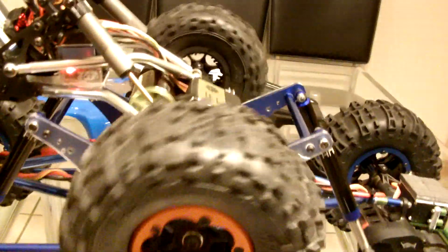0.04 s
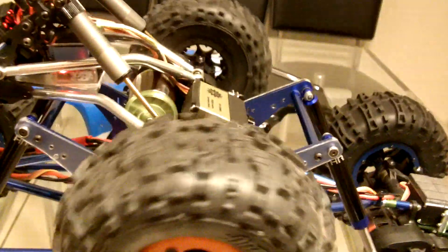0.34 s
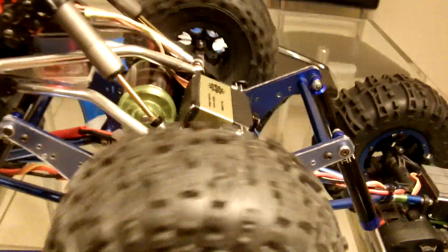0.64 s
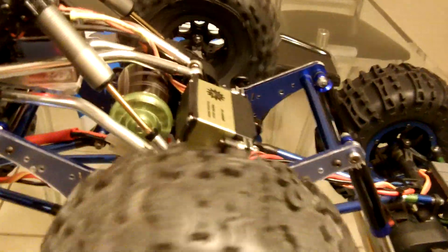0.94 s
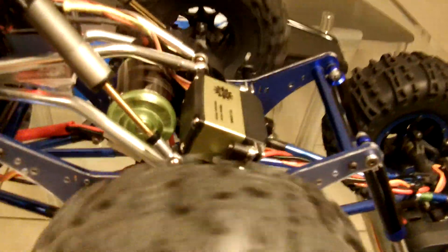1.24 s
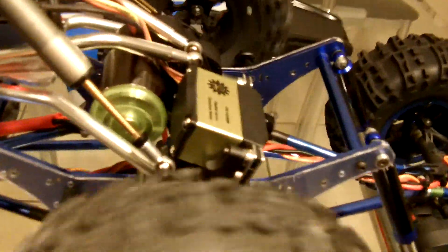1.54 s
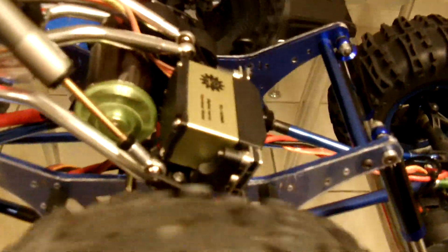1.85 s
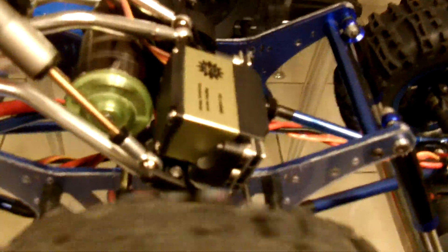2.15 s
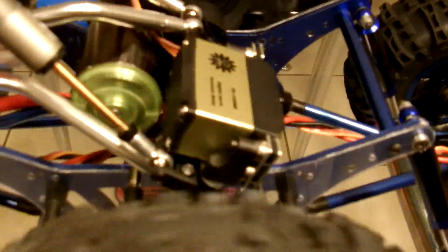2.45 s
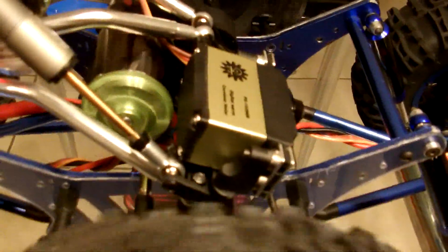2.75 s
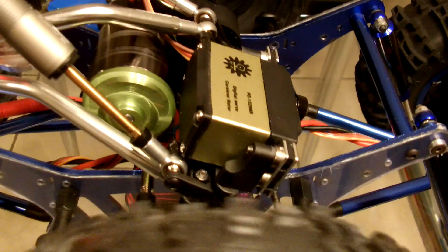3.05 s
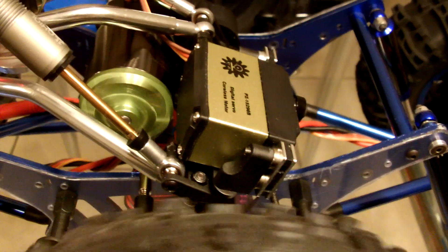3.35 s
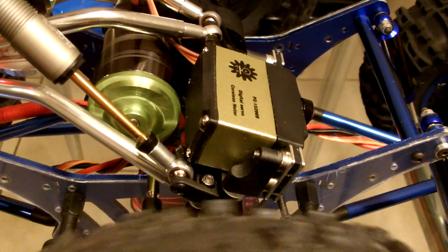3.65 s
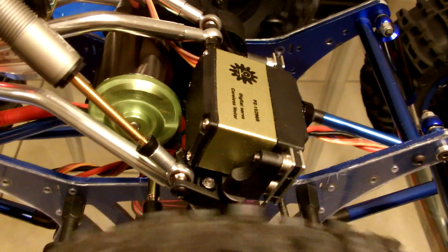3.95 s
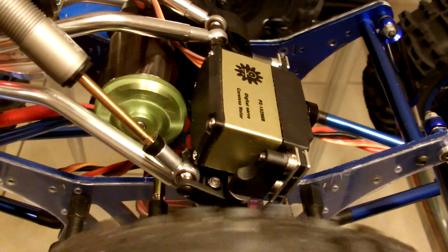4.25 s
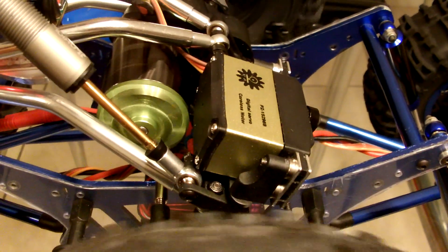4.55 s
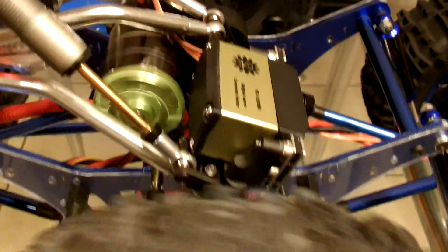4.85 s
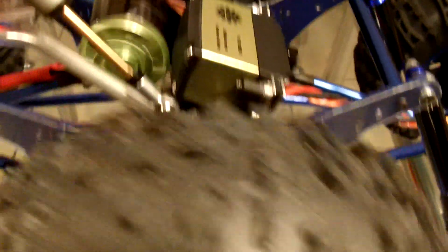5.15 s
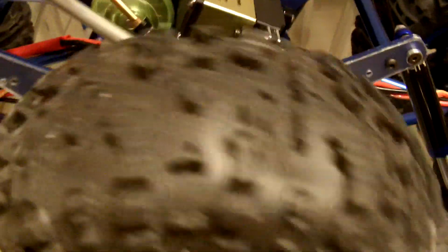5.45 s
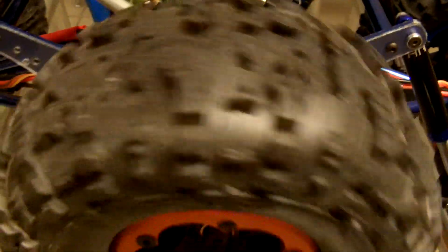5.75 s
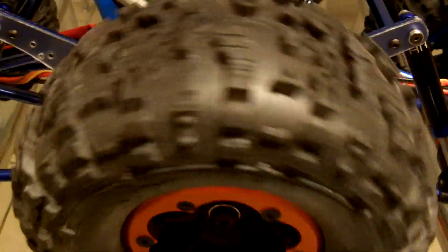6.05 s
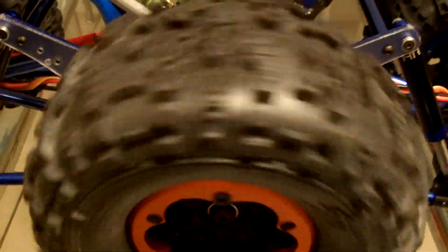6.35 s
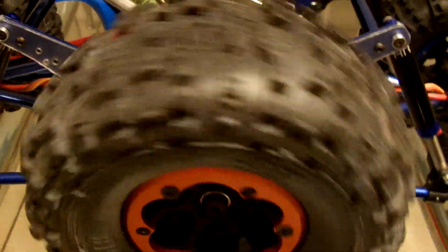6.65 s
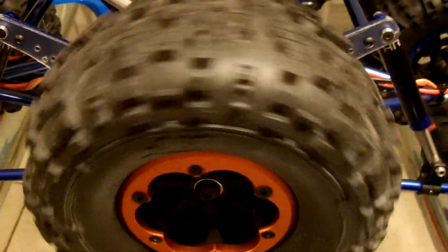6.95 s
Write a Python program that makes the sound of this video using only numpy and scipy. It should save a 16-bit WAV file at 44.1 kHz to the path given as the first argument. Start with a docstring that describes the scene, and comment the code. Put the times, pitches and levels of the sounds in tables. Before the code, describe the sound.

Close up, a remote-control crawler's motor gives a thin, steady high whine while its gears rasp lightly and tick now and then.

```python
"""A brushless motor creeps in a model crawler on a stand, turning its wheels close to a handheld camera.
From the start the speed controller's switching tone sings in the windings, modulated by each commutation
step; the steps ring the motor can, rattle the gears and shake the chassis, and the shaft surges once a
turn. In the first two seconds come a short hum, a dull bump and a second hum; soft ticks recur throughout.
The camera moves in, then draws back after five seconds, and near reflections comb the hiss as it goes."""
import sys
import numpy as np
from scipy import signal
from scipy.fft import rfft, irfft, next_fast_len
from scipy.io import wavfile
from scipy.ndimage import map_coordinates

SR = 44100
rng = np.random.default_rng(int(sys.argv[2]) if len(sys.argv) > 2 else 0)


def transcribe(signal):
    """Save signal, clipped to [-1, 1], as a 16-bit WAV file at the path in sys.argv[1]."""
    frames = np.atleast_2d(signal).T
    limited = np.clip(frames, -1, 1)
    pcm = np.round(limited * 32767).astype(np.int16)
    wavfile.write(sys.argv[1], SR, pcm)


N = 313330
TIME = np.arange(N) / SR


def amp(db):
    return 10 ** (np.asarray(db) / 20)


def unit_rms(x):
    return x / np.sqrt(np.mean(x ** 2) + 1e-20)


def along(points, hz):
    """Interpolation of (Hz, value) points on a log frequency axis."""
    f, values = np.transpose(points)
    return np.interp(np.log(hz + 1), np.log(f + 1), values)


def curves(rows):
    """Linear interpolation: one value per sample for each column after the time."""
    times, *columns = np.transpose(rows)
    return [np.interp(TIME, times, column) for column in columns]


def wobble(rate):
    """Smooth random modulation with rate knots a second."""
    grid = np.arange(0, N * rate / SR + 1, 1 / 4)
    knots = rng.standard_normal(int(N * rate / SR) + 4)
    return np.interp(TIME * rate, grid, map_coordinates(knots, [grid]))


def pulse(phase, at, width):
    """A periodic Gaussian pulse; place and width in cycles."""
    return np.exp(-(((phase - at + .5) % 1 - .5) / width) ** 2)


def filtered(x, response):
    """Linear filtering by a complex frequency response."""
    size = next_fast_len(N + SR // 2)
    return irfft(rfft(x, size) * response(np.fft.rfftfreq(size, 1 / SR)), size)[..., :N]


def resonance(f, hz, width):
    """Response of a damped oscillator; bandwidth in Hz."""
    return 1j * f * width / (hz * hz - f * f + 1j * f * width)


def mode(hz, width, skirt=0.13):
    """Two resonances in cascade: the broad one steepens the skirts of the narrow one."""
    return lambda f: resonance(f, hz, width) * resonance(f, hz, skirt * hz)


def panned(db):
    """Constant-power gains for a left-minus-right level difference."""
    gains = amp(np.array([db, -db]) / 2).reshape(2, -1)
    return gains / np.sqrt(np.mean(gains ** 2, axis=0))


# Likeness of the two channels. Each row: frequency in Hz, left-right coherence from 0 to 1.
COHERENCE = [(100, 1), (350, 0.89), (650, 0.77), (1100, 0.96), (2200, 1), (3700, 0.92), (7000, 0.91),
             (10000, 0.73), (15000, 0.33)]

def shaken(force, response, lag_s=1.5e-5):
    """Random forcing of a linear system: partly coherent stereo noise of rms 1, the right side leading."""
    size = next_fast_len(N + SR // 8, real=True)
    f = np.fft.rfftfreq(size, 1 / SR)
    coherence = along(COHERENCE, f)
    spectrum = rfft(force * rng.standard_normal((2, N)), size) * response(f)
    mid, side = spectrum * np.sqrt([1 + coherence, 1 - coherence])
    left = (mid + side) * np.exp(-2j * np.pi * f * lag_s)
    return unit_rms(irfft([left, mid - side], size)[:, :N])


# Spectrum of the room air. Each row: frequency in Hz, relative density in dB.
AIR_SPECTRUM = [(20, -40), (65, -38), (105, -18), (160, -4), (210, -4), (350, -3), (500, 0), (900, -7.5),
                (3000, -22), (15000, -45)]
# The room's low hum. Each row: time in seconds, mean level in dB.
ROOM_HUM = [(0.0, -85), (.6, -84), (.85, -74.5), (1.4, -75), (1.8, -85), (2.7, -83.5), (3.0, -75.5),
            (4.4, -78), (4.9, -74), (5.4, -78.5), (5.9, -75), (6.6, -77.5), (7.1, -81)]

def room(air_db=-68.0, hum_hz=236):
    """Ambient noise: quiet air and a faint hum under random amplitude and phase modulation."""
    hum_db, = curves(ROOM_HUM)
    level = amp(hum_db + 2.7 * wobble(9))
    hum = level * np.sqrt(2) * np.sin(2 * np.pi * hum_hz * TIME + 1.9 * wobble(8))
    return hum + amp(air_db) * shaken(1, lambda f: amp(along(AIR_SPECTRUM, f)))


# Hums near the microphone. Each row: start in seconds, end in seconds, level in dB.
SHORT_HUMS = [(0.162, 0.402, -57.5), (1.613, 1.955, -62)]

def short_hums(hz=460.0, fade_s=0.11, left_lead_rad=0.18):
    """A nearly pure tone under two trapezoidal envelopes."""
    swell = sum(amp(db) * np.clip(np.minimum(TIME - start, end - TIME) / fade_s + .5, 0, 1)
                for start, end, db in SHORT_HUMS)
    phase = 2 * np.pi * hz * TIME + 0.13 * wobble(19) + np.array([[left_lead_rad], [0]])
    return swell * np.sqrt(2) * np.sin(phase)


def struck(start, modes, attack_s=0.0001):
    """Free vibration: (Hz, dB, T60 in seconds) modes start together and decay exponentially."""
    t = np.arange(SR // 5) / SR
    ring = sum(amp(db + rng.normal(0, 1) - 60 * t / t60) * np.sin(2 * np.pi * hz * t)
               for hz, db, t60 in modes)
    return np.pad(ring * (1 - np.exp(-t / attack_s)), (round(start * SR), N))[:N]


def bump(start_s=.5975, gain_db=-52):
    """Low, heavily damped modes with a soft onset make one dull bump."""
    modes = [(130, -12, .05), (214, -6, 0.05), (260, 3.5, 0.058)]
    return amp(gain_db) * struck(start_s, modes, attack_s=0.0023)


# Soft ticks. Each row: start in seconds, gain in dB, extra gain of the low knock in dB.
TICKS = [(0.435, -44.5, 4), (1.0797, -44, -4), (2.0868, -38.5, -9), (2.7815, -41, -5.5),
         (3.5166, -41.5, -2), (4.2249, -41.5, -3.5), (5.2257, -40.5, -6), (5.921, -44.5, 1),
         (6.6447, -48.5, 6)]
# Modes of a tick and of its knock. Each row: frequency in Hz, relative level in dB, T60 in seconds.
TICK_MODES = [(1130, 1, 0.0084), (1380, 1, 0.015), (1870, -6, 0.015), (2200, -21, 0.0047)]
KNOCK_MODES = [(290, -10, 0.027), (583, 3.5, .016)]

def ticks(low_cut_hz=290):
    """Impulse excitation: dry ticks near the microphone, too light to carry bass."""
    rings = sum(amp(db) * (struck(start, TICK_MODES) + amp(knock_db) * struck(start, KNOCK_MODES))
                for start, db, knock_db in TICKS)
    return filtered(rings, lambda f: (1j * f / (1j * f + low_cut_hz)) ** 2)


# The shaft's progress, about nine turns a second. Each row: time in seconds, turns completed.
SHAFT_TURNS = [(-0.148, 0), (0.259, 4), (0.917, 10), (1.533, 16), (2.871, 28), (3.332, 32), (4.06, 38),
               (4.688, 44), (6.027, 56), (6.486, 60), (7.192, 66)]

def rotation(steps_per_turn=13.91, surge=.155, gear_steps=26.35, gear_surge=.052, jitter=.014):
    """Periodic load: shaft and slower gear each drag once a turn, modulating the commutation rate."""
    shaft, = curves(SHAFT_TURNS)
    steps = steps_per_turn * (shaft - surge * np.sin(2 * np.pi * shaft) / (2 * np.pi))
    steps -= gear_surge * gear_steps * np.sin(2 * np.pi * (steps / gear_steps + .43)) / (2 * np.pi)
    return shaft, steps + jitter * wobble(90)


# Groans of the drive train. Each row: peak time in seconds, frequency in Hz, relative level in dB.
GROANS = [(0.871, 405, -68), (1.084, 420, -66.3), (1.18, 415, -65.7), (1.386, 410, -68),
          (1.487, 430, -66.0), (1.708, 400, -66.7), (2.264, 416, -66), (2.379, 400, -68),
          (2.504, 400, -65.1), (2.597, 400, -65), (2.718, 402, -65), (2.949, 400, -66.7),
          (3.174, 400, -65.0), (3.403, 400, -68.0), (4.116, 397, -66), (4.335, 415, -63.4),
          (4.451, 424, -64), (4.542, 426, -64.4), (4.654, 417, -63.7), (4.743, 400, -67), (4.866, 397, -68),
          (5.082, 410, -65.1), (5.372, 430, -65), (5.532, 410, -66), (5.758, 415, -66), (5.864, 395, -70),
          (6.206, 404, -68.6), (6.555, 400, -70)]

def groans(gain_db=1.0, swell_s=0.021):
    """Gaussian tone bursts: brief tones near 400 Hz swell in the chassis, mostly as the shaft surges."""
    t = np.arange(-SR // 10, SR // 10) / SR
    swell = np.exp(-(t / swell_s) ** 2)
    out = np.zeros(N + SR)
    for peak, hz, db in GROANS:
        tone = np.sqrt(2) * np.sin(2 * np.pi * (hz * t + rng.random()))
        out[round((peak + t[0]) * SR):][:len(t)] += amp(db + gain_db) * swell * tone
    return out[:N]


# Modes of the chassis. Each row: frequency in Hz, bandwidth in Hz, relative level in dB.
CHASSIS_MODES = [(237, 17, -4.5), (407, 27, -3.5), (467, 16, 4), (546, 40, 0.5), (730, 71, -6),
                 (1548, 61, -1.5)]

def chassis(shaft, steps, level_db=-65.5, scatter=0.14, radiate_hz=170, surge_db=3.5):
    """Modal superposition: torque steps thud through a chassis too small to radiate deep bass."""
    def response(f):
        modes = sum((-1) ** k * amp(db) * resonance(f, hz, width)
                    for k, (hz, width, db) in enumerate(CHASSIS_MODES))
        return modes * f * f / (f * f + radiate_hz ** 2)

    jolts = np.diff(np.floor(steps), prepend=np.floor(steps[0]))
    jolts *= 1 + scatter * rng.standard_normal(N)
    jolts *= amp(surge_db * pulse(shaft, at=0.63, width=0.12))
    return amp(level_db) * unit_rms(filtered(jolts, response))


# Reflection off the tyre. Each row: time in seconds, delay in milliseconds, share of direct amplitude.
TYRE_ECHO = [(0.0, 0.66, 0.13), (.27, 0.69, 0.12), (.7, 0.77, 0.16), (1.25, 0.75, 0.098), (1.6, 0.84, 0.14),
             (4.95, 0.85, 0.032), (5.3, 0.78, 0.12), (5.6, 0.77, 0.12), (6.0, 0.77, 0.12),
             (6.5, 0.74, 0.089), (7.1, 0.74, 0.16)]
# Reflection off the frame, heard from above. Each row: time in seconds, share of direct amplitude.
FRAME_ECHO = [(1.3, 0), (1.7, .24), (4.6, .24), (5.1, .18), (5.4, 0)]

def reflections(direct, frame_ms=1.093, phase_rad=1.5, second_ms=0.55, second_share=0.36):
    """Comb filtering: short echoes interfere with the direct sound, and shift as the camera moves."""
    hz, t, spectra = signal.stft(direct, SR, nperseg=512)
    tyre_ms, tyre, frame = (np.interp(t, TIME, c) for c in curves(TYRE_ECHO) + curves(FRAME_ECHO))
    delay = lambda ms: np.exp(-2j * np.pi * hz[:, None] * ms / 1000)
    first = np.exp(-1j * phase_rad) * (tyre * delay(tyre_ms) + frame * delay(frame_ms))
    second = second_share * tyre * delay(tyre_ms + second_ms)
    return signal.istft(spectra * (1 + first + second), SR, nperseg=512)[1][:, :N]


# Teeth that catch. Each row: peak time in seconds, lift below the split in dB, lift above it in dB.
SCRAPES = [(.28, 2.5, 4), (.402, 0.5, 3), (.515, 2.5, 1), (.735, 6, 4.5), (.945, 0, 1), (1.15, 3.5, 1),
           (1.362, 4.5, 1), (1.563, 3.5, 2), (1.8, 2, 0), (2.007, 2.5, 3), (2.11, 2, 4.5), (2.26, 5, 5),
           (2.35, 1.5, 2), (2.575, 3, 3.5), (2.688, 3, -2), (2.796, 0, 4), (3.028, 6, 1.5), (3.16, 2, 1),
           (3.255, 1.5, 1), (3.74, 1.5, 0), (3.98, 1.5, 1), (4.085, 1.5, 4), (4.22, 3.5, 2),
           (4.312, 3.5, 6.5), (4.415, 5, 4), (4.512, 3.5, 3.5), (4.61, 4.5, 3), (4.716, 2, 3),
           (4.935, 3, 6), (5.17, 4, -2), (5.614, 5, -2), (5.74, 0.5, 3), (5.949, 0, 1), (6.08, -1, 5),
           (6.165, 3, 7), (6.31, 0, 5), (6.407, 0, 6), (6.545, 0, 5), (6.881, 2, 7)]

def scraped(rustle, split_hz=3900, rise_s=0.0055, fade_s=0.033):
    """Transient friction: catching teeth lift the rustle, dully or brightly; it rises fast and fades."""
    t = TIME[::32]
    peaks, *lifts = np.transpose(SCRAPES)
    since = t - peaks[:, None]
    shapes = np.exp(-np.clip(np.maximum(-since / rise_s, since / fade_s), 0, 20))
    middle_gain, treble_gain = (amp(np.interp(TIME, t, db @ shapes)) for db in lifts)
    middle = filtered(rustle, lambda f: 1 / (1 + (f / split_hz) ** 10))
    return middle_gain * middle + treble_gain * (rustle - middle)


# Spectrum of the rubbing teeth. Each row: frequency in Hz, relative density in dB.
RUSTLE_SPECTRUM = [(100, -52), (300, -14.5), (600, -8.5), (950, -8), (1400, -1.5), (1800, -2.5),
                   (2400, -1.5), (3050, -0.5), (3450, -2), (4000, 1), (4400, 1.5), (4950, 1), (5520, 4),
                   (5800, 2), (6400, -3), (13000, 0), (15500, 0.5)]

def gear_rustle(shaft, steps, near_db, gain_db=-47, gear_ratio=.528):
    """Sliding friction: teeth rub harder once per turn of the shaft and of the slower gear."""
    rub_db = 1.18 * np.cos(2 * np.pi * (shaft - 0.42))
    rub_db += 0.93 * np.cos(2 * np.pi * (gear_ratio * shaft - 0.19))
    grain_db = 0.74 * wobble(40) + 1.5 * wobble(700)
    friction = amp(rub_db + grain_db) * (1 + 0.33 * pulse(steps, at=0.097, width=0.062))
    rustle = shaken(friction, lambda f: amp(along(RUSTLE_SPECTRUM, f)))
    return amp(gain_db + 0.46 * near_db) * scraped(rustle)


# Spectrum of the steps' rasp. Each row: frequency in Hz, relative density in dB.
RASP_SPECTRUM = [(2500, -22.5), (5000, -18.5), (6400, -3.5), (7100, -1), (7480, 6), (7660, 4), (7850, 6),
                 (8400, 0.5), (8850, -7), (9850, -6.5), (11200, -0.5), (12700, -19), (14000, -9),
                 (15500, -8.5)]

def step_rasp(steps, near_db, gain_db=-45):
    """Pulse-modulated noise: each step rasps as the current changes winding."""
    force = 0.5 + pulse(steps, at=0.747, width=0.03) + .5 * pulse(steps, at=0.5, width=0.085)
    rasp = shaken(force, lambda f: amp(along(RASP_SPECTRUM, f)))
    return amp(gain_db + 1.18 * near_db) * panned(-1.7) * rasp


def throb(shaft, at):
    """Modulation at the fourth harmonic of the shaft's rotation."""
    return np.cos(2 * np.pi * (4 * shaft - at))


# Ringing of the gear case. Each row: time in seconds, lower mode level in dB, upper mode level in dB.
CASE_LEVELS = [(0.0, -57, -60), (0.55, -56, -56.5), (1.0, -54, -54), (1.55, -60.5, -60.5),
               (2.1, -58.5, -59.5), (2.6, -63, -53), (3.3, -61, -54.5), (4.55, -58.5, -53),
               (5.05, -58, -60), (5.4, -57, -53), (6.2, -54.5, -53.5), (6.55, -56.5, -56), (6.85, -54, -55),
               (7.1, -58, -54)]

def gear_case(shaft, waver_rad=0.71):
    """Resonance: the meshing gears keep two modes of their case ringing at a wavering pitch."""
    low_db, high_db = curves(CASE_LEVELS)
    mesh = amp(0.3 * throb(shaft, at=0.79) + 0.97 * wobble(60))
    ring = amp(low_db) * shaken(mesh, mode(hz=3705, width=56, skirt=0.074))
    ring += amp(high_db) * shaken(mesh, mode(hz=3860, width=60, skirt=0.074))
    analytic = signal.hilbert(ring, next_fast_len(N))[:, :N]
    return np.real(analytic * np.exp(1j * waver_rad * wobble(70)))


# The can's top mode. Each row: time in seconds, relative level in dB, left minus right in dB.
CAN_TOP_MODE = [(0.0, -46, 3.5), (0.65, -44, -4.0), (0.75, -43, 9.0), (1.03, -46.5, -5.0), (1.3, -41, 5.0),
                (1.56, -44.5, 5), (1.74, -43.5, -6.5), (2.19, -44.5, 7.0), (2.89, -43.5, 2), (3.14, -44, 9),
                (4.67, -43.5, 2.5), (5.46, -45, 6.0), (5.59, -41.5, 0.0), (6.11, -43.5, 8.5),
                (6.58, -48.5, -7), (7.1, -43, 10.0)]

def motor_can(shaft, steps, near_db, low_db=-52, mid_db=-39.5, top_gain_db=4.0, follow=0.91):
    """Shell resonance: each step rings the can. Its lowest mode swells once a turn as the shaft
    speeds up; the higher two flutter four times a turn."""
    top_db, top_pan = curves(CAN_TOP_MODE)
    kicks = 1.65 + pulse(steps, at=0.76, width=0.055)
    low = shaken(kicks * amp(4.0 * pulse(shaft, at=0.45, width=0.17)), mode(hz=9300, width=180))
    mid = shaken(kicks * amp(3.5 * throb(shaft, at=0.64)), mode(hz=11752, width=56))
    top = shaken(kicks * amp(throb(shaft, at=.2)), mode(hz=14962, width=69))
    return (amp(low_db + follow * near_db) * panned(-1.7) * low
            + amp(mid_db + follow * near_db) * panned(-1.6) * mid
            + amp(top_db + top_gain_db) * panned(top_pan) * top)


# The switching tone and its sidebands fade in and out as the camera crosses their standing waves.
# Each row: time in seconds, relative level in dB, left minus right in dB.
CARRIER = [(0.0, -40.4, -4), (0.45, -48.9, 3), (0.75, -40.8, -14), (1.45, -47.4, 1), (1.6, -42.9, -11),
           (2.05, -44.2, -17), (2.35, -40.1, -10), (3.2, -41.8, -4), (4.85, -40.7, -9), (5.15, -43.8, -8),
           (5.5, -39.4, -5), (5.65, -43.0, -6), (5.8, -55.4, -1), (6.2, -47.3, -10), (6.5, -58.7, -1),
           (6.95, -43.3, -5), (7.1, -43.4, -2)]
LOWER_SIDEBAND = [(0.0, -42.9, 12), (0.25, -44.2, -3), (0.35, -47.4, -6), (0.7, -41.6, -1),
                  (1.15, -45.7, -5), (1.3, -42.5, -6), (1.45, -46.5, -3), (1.65, -39.4, -5),
                  (1.8, -41.7, -3), (2.2, -39.3, -6), (3.2, -42.0, -5), (4.75, -41.3, -3), (5.2, -42.4, -5),
                  (5.7, -40.2, 2), (6.75, -42.7, -1), (6.85, -48.5, 0), (7.1, -47.7, 0)]
UPPER_SIDEBAND = [(0.0, -47.7, -8), (0.2, -51.9, -8), (0.35, -50.0, 1), (0.75, -52.5, -4),
                  (1.0, -40.3, -11), (1.15, -39.5, -7), (1.85, -50.1, -1), (2.05, -43.2, -3),
                  (3.0, -43.2, -8), (3.5, -45.8, -4), (4.65, -41.1, -10), (5.2, -46.5, 0), (5.3, -49.6, -1),
                  (5.6, -44.3, -2), (5.8, -48.8, 2), (6.15, -46.8, 7), (7.1, -44.5, -4)]

def switching_whine(shaft, steps, switch_hz=8027.4, second_order_db=-17, twist_rad=1.29, drift_rad=0.12):
    """Amplitude and phase modulation: the steps give the tone sidebands that follow the surges."""
    load_db = 1.5 * np.cos(2 * np.pi * shaft)  # the modulation is deepest where the shaft drags
    step = np.exp(2j * np.pi * steps)

    def heard(table, gain_db, lead_rad):
        level_db, pan = curves(table)
        return amp(level_db + gain_db) * panned(pan) * np.exp(0.5j * np.array([[lead_rad], [-lead_rad]]))

    def sideband(phasor):
        return amp(load_db + 1.44 * wobble(70)) * (phasor + amp(second_order_db) * phasor ** 2)

    carrier = heard(CARRIER, gain_db=0.8 * wobble(75), lead_rad=0.37)
    lower = heard(LOWER_SIDEBAND, gain_db=-0.2, lead_rad=-1.17) * sideband(step.conj())
    upper = heard(UPPER_SIDEBAND, gain_db=-1.0, lead_rad=-1.03) * sideband(step)
    envelope = carrier + lower + upper * np.exp(1j * twist_rad)
    phase = 2 * np.pi * switch_hz * TIME + drift_rad * wobble(56)
    return np.sqrt(2) * np.real(envelope * np.exp(1j * phase))


# The camera moves in over the motor and back out. Each row: time in seconds, closeness in dB.
CLOSENESS = [(0.0, -3.5), (0.35, -4), (2.0, -1), (3.4, 0), (4.6, -0.8), (5.15, 0), (5.6, -3.5), (7.1, -5)]

def scene():
    """Superposition: the drive train, paced by one rotation, adds to small sounds in a quiet room."""
    shaft, steps = rotation()
    near_db, = curves(CLOSENESS)
    whine = switching_whine(shaft, steps)
    metal = gear_case(shaft) + motor_can(shaft, steps, near_db)
    hiss = reflections(gear_rustle(shaft, steps, near_db) + step_rasp(steps, near_db))
    drive_train = whine + metal + hiss + chassis(shaft, steps) + groans()
    return drive_train + ticks() + short_hums() + bump() + room()


def record(dry, low_cut_hz=105, top_hz=15350):
    """Band limiting: the camera thins the deep bass and passes nothing above its top frequency."""
    return filtered(dry, lambda hz: hz * hz / np.hypot(hz * hz, low_cut_hz ** 2) * (hz < top_hz))


dry = scene()
out = record(dry)
transcribe(out)
```